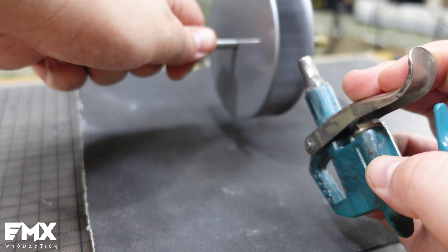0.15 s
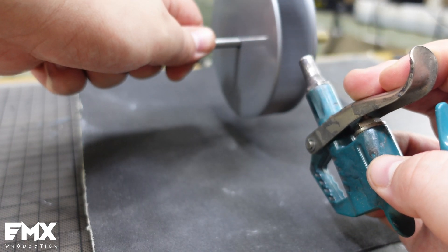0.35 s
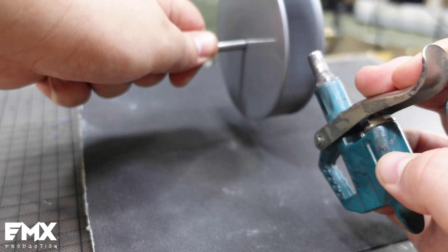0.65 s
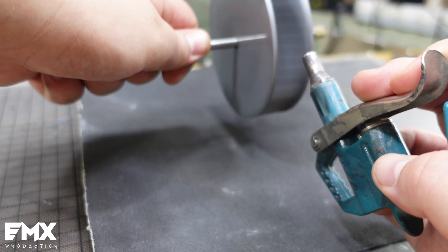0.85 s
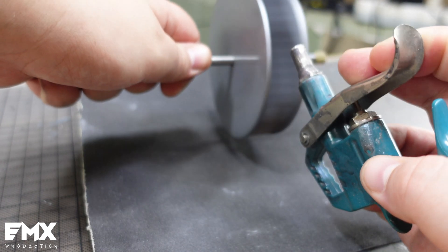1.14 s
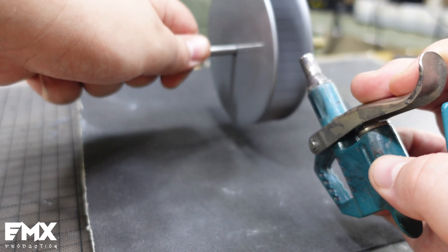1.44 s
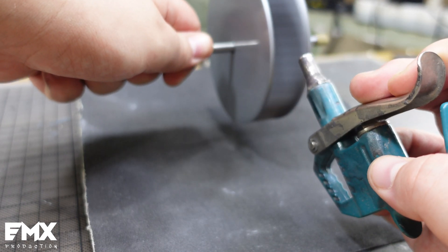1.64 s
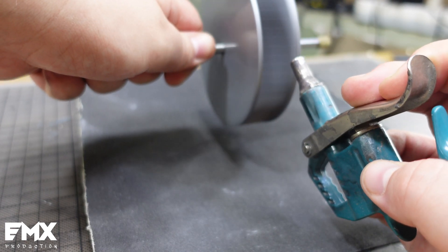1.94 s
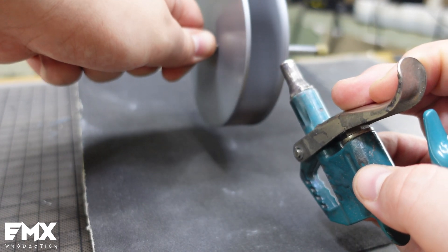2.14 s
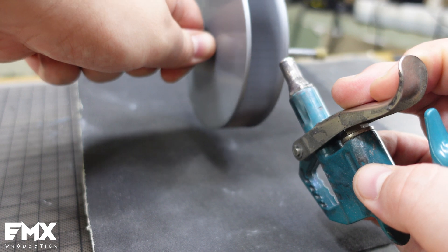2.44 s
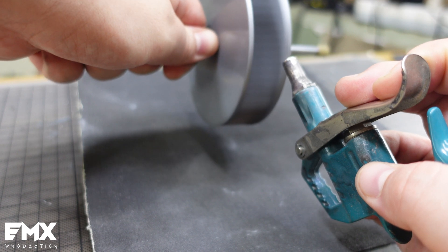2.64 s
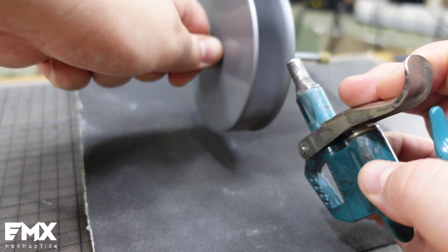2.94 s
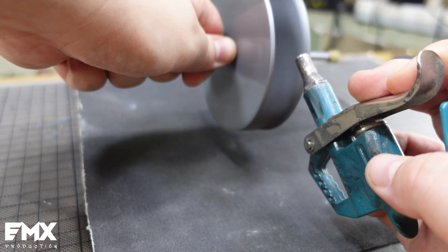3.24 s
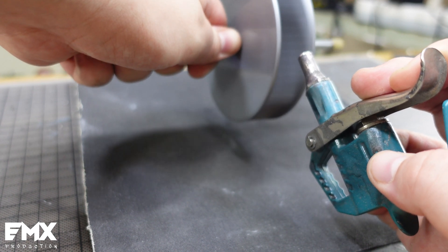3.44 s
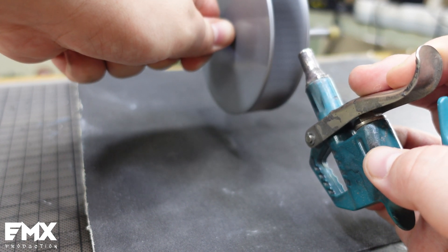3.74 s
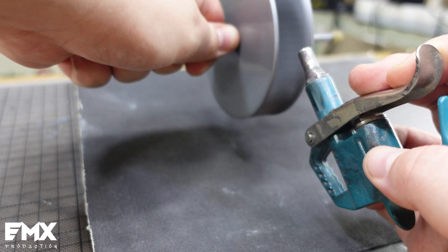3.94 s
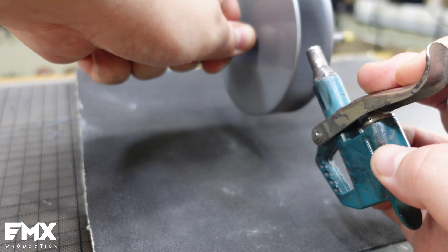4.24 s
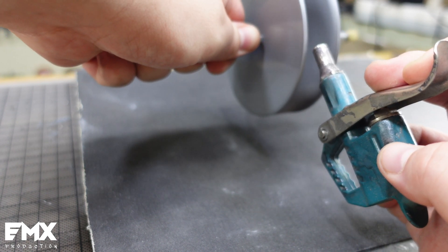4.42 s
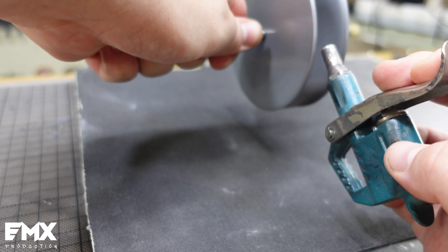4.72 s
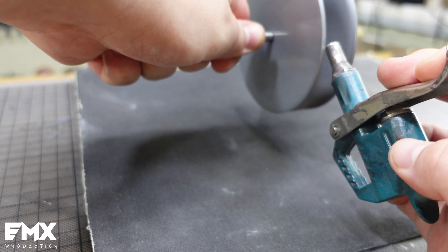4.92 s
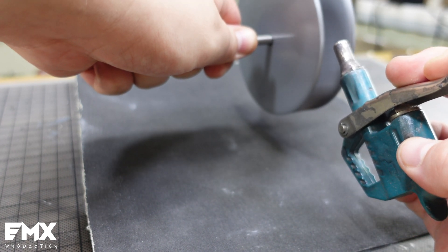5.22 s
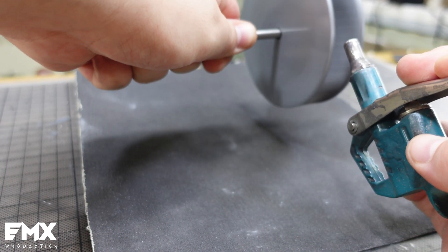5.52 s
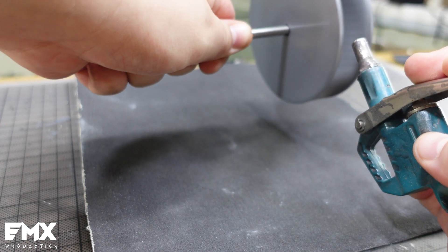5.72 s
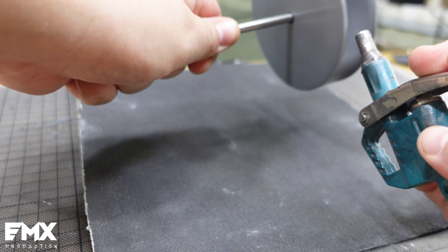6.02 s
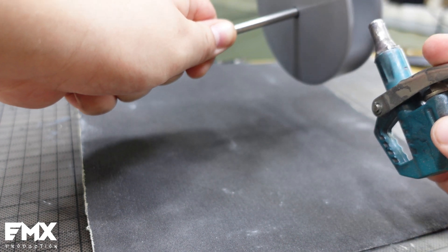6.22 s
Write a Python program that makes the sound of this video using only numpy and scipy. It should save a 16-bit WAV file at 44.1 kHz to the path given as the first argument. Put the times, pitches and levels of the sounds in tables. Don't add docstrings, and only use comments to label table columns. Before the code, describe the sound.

A close air jet spins up a little turbine: rough hiss, rising siren-like whine, one quick double click, then a piercing wavering high tone.

```python
import sys
import numpy as np
from scipy import signal
from scipy.io import wavfile
from scipy.ndimage import uniform_filter1d

SR = 44100
rng = np.random.default_rng(int(sys.argv[2]) if len(sys.argv) > 2 else 0)


def wav_out(sig):
    wavfile.write(sys.argv[1], SR, np.round(np.clip(np.atleast_2d(sig).T, -1, 1) * 32767).astype(np.int16))


def attenuation_scalar(level_db):
    decades = np.asarray(level_db, float) / 20
    return 10 ** decades


N = 280782
TIME = np.arange(N) / SR
HZ = np.fft.rfftfreq(1024, 1 / SR)[:, None]
FRAMES = np.arange(N // 256 + 5) * 256 / SR

# time in seconds, share turned away 0-1.
POSE = [
    (0, .15),
    (1.7, .1),
    (3.3, .1),
    (3.55, .3),
    (3.8, .9),
    (4.9, .9),
    (5.8, .75),
    (6., .4),
    (6.37, .3),
]


def evened(x):
    return x / np.sqrt(np.mean(x ** 2) + 1e-20)


def read(points, hz):
    f, value = np.transpose(points)
    return np.interp(np.log(hz + 1), np.log(f + 1), value)


def columns(rows, t=TIME):
    s, *values = np.transpose(rows)
    return [np.interp(t, s, v) for v in values]


def bumps(rows):
    t = TIME[::64]
    humps = sum(height * np.exp(-((t - s) / half) ** 2) for s, height, half in rows)
    return np.interp(TIME, t, humps)


def wander(rate_hz):
    low_pass = signal.butter(2, rate_hz, fs=SR, output="sos")
    return evened(signal.sosfilt(low_pass, rng.standard_normal(N)))


def shut():
    return np.interp(TIME, [.5895, .593, .603, .617], [0, 1, 1, 0])


def sag(step_db, drain_db, early_s=0):
    # start in seconds, reopening in seconds, refill time in seconds.
    slips = [
        (.482, .605, .018),
        (1.106, 1.2105, .001),
    ]
    slip_s, surge_db, surge_s = .008, 2, .01
    loss_db = 0
    for start, reopens, refill_s in slips:
        since = np.maximum(TIME - reopens, 0)
        closing = np.clip((TIME - start + early_s) / slip_s + .5, 0, 1)
        drained = np.clip((TIME - start) / (reopens - start), 0, 1) ** 2
        loss_db = loss_db + closing * (step_db + drain_db * drained) * np.exp(-since / refill_s)
        loss_db = loss_db + surge_db * (TIME > reopens) * np.exp(-since / surge_s)
    return loss_db


def drone():
    s, db, half, hz = 8, -70, 3, 206
    return bumps([(s, attenuation_scalar(db), half)]) * np.cos(2 * np.pi * hz * TIME)


def noise(gain, patchy_db, flicker_db, flicker_hz):
    # frequency in Hz, difference in dB.
    port_lean = [(60, 0.0), (700, 0.24), (1290, 0.2), (2380, -0.4), (4400, -0.8), (8120, 0.8), (15000, 1.9)]
    # frequency in Hz, dB under the ports' sum.
    facing_width = [(300, -28), (2300, -30), (2900, -11), (4100, -9), (4900, -16), (6200, -11), (8000, -16),
                    (9500, -16.5), (14200, -14.5), (14800, -24)]
    turned_width = [(300, -29), (2300, -32), (3300, -2), (4300, -20), (5200, 1), (5900, -20), (6600, -6),
                    (8000, -15.5), (13500, -13), (14400, -26)]
    side_echo_ms, side_echo_turns, side_echo_share = .76, .85, .3

    a, b, c, d, patches = rng.standard_normal((len(FRAMES), len(HZ), 5)).T
    patches = uniform_filter1d(patches, size=6, axis=0)
    patches = evened(uniform_filter1d(patches, size=50, axis=1))
    mid = a + 1j * b
    turned = columns(POSE, FRAMES)[0]

    share = side_echo_share * (1 - turned)
    echo = mid * np.exp(-2j * np.pi * (HZ * side_echo_ms / 1000 - side_echo_turns))
    width_db = (1 - turned) * read(facing_width, HZ) + turned * read(turned_width, HZ) - 3
    width_db = width_db + 4.5 * patches[::-1]
    apart = attenuation_scalar(width_db) * (np.sqrt(share) * echo + np.sqrt(1 - share) * (c + 1j * d))

    lean = attenuation_scalar(read(port_lean, HZ) / 2)
    z = np.array([(mid + apart) * lean, (mid - apart) / lean])
    z = z * gain * attenuation_scalar(patchy_db * patches) / np.sqrt((gain ** 2).mean(0))
    sound = signal.istft(z, nperseg=1024, noverlap=768)[1][:, :N]
    return evened(sound) * attenuation_scalar(flicker_db * wander(flicker_hz))


def ring(modes):
    power = 0
    for hz, width_hz, db in modes:
        off = (HZ - hz) / width_hz
        power = power + attenuation_scalar(2 * db) / (1 + (2 * off) ** 4 + (1.26 * off) ** 8)
    return np.sqrt(power)


def near_echoes():
    # time in seconds, then four echo delays in ms.
    holds = [(0, .53, .76, 1.066, 1.21), (1.7, .525, .76, 1.068, 1.212), (2.4, .555, .77, 1.08, 1.216),
             (3.4, .51, .77, 1.09, 1.215), (3.8, .555, .866, 1.122, 1.215), (4.3, .534, .866, 1.108, 1.2),
             (4.9, .534, .866, 1.06, 1.19), (5.1, .536, .868, .964, 1.186), (5.6, .542, .872, .964, 1.182),
             (6., .505, .875, .964, 1.176), (6.37, .512, .88, .958, 1.166)]
    echo_shares = [.2, .2, .14, .13]
    echoes = sum(share * np.exp(-2j * np.pi * HZ * ms / 1000)
                 for share, ms in zip(echo_shares, columns(holds, FRAMES)))
    return abs(1 + np.minimum(HZ / 8700, 1) * echoes)


def buffeting(aim):
    # frequency in Hz, level in dB per Hz.
    buffet_colour = [(30, -40), (60, -26), (115, -37), (150, -23), (200, -7), (500, 0), (1000, 1),
                     (2000, -2), (4000, -44)]
    # time in seconds, dB, half length in seconds.
    gusts = [(.12, 4.5, 0.3), (.26, 1, 0.037), (.73, 1.5, 0.045), (.8, -2, 0.029), (1., 7, 0.17),
             (1.09, -12, 0.086), (1.17, 3, 0.037), (1.24, -14, 0.058), (1.32, 1, 0.056), (1.43, -9, 0.059),
             (1.75, 1.5, 0.074), (2.08, -6, 0.081), (2.55, 2.5, 0.12), (3.06, 2.5, 0.19), (3.38, 3, 0.072),
             (3.58, -6.5, 0.047), (3.66, 2, 0.058), (3.78, -2, 0.042), (3.9, 3.5, 0.03), (4.08, -4, 0.11),
             (4.58, -7.5, 0.12), (4.85, 6, 0.04), (4.94, 13, 0.093), (5.13, -7.5, 0.061), (5.54, -8, 0.11),
             (5.8, -7.5, 0.13), (5.95, -16, 0.074), (6.12, -7, 0.19), (6.32, -1, .05)]
    sag_db = (1 - .75 * aim) * sag(-19, 0, early_s=.009)
    level_db = -12 - 15.5 * aim + bumps(gusts) + sag_db - 14 * shut()
    return attenuation_scalar(level_db) * noise(attenuation_scalar(read(buffet_colour, HZ)), 0.51, 3.53, 216)


def hiss(aim, comb, lost_db):
    # frequency in Hz, level in dB per Hz; low part, then wheel facing and turned.
    low_hiss = [(100, -77), (700, -20), (1500, -14.5), (2500, -12), (3500, -7)]
    facing_hiss = [(4300, -6.5), (4950, -5.5), (6930, -0.5), (7850, -3.5), (8500, 2.5), (10500, 0),
                   (11300, -3), (14200, -4.5), (15500, -8)]
    turned_hiss = [(4000, -6.5), (4910, -10), (5810, -8.5), (6440, -5.5), (7130, -14.5), (9150, -2),
                   (10100, -4), (11500, -3), (14200, -7), (14950, -7.5)]
    # time in seconds, centre in Hz, depth in dB.
    table_notch = [(0, 13750, 6), (1.8, 13800, 6), (2.4, 13500, 1), (4.7, 14900, 0), (5.1, 14900, 8),
                   (5.9, 14870, 2), (6.37, 14700, 4)]
    slack = (1.155, 8.3, 0.045)

    turned = columns(POSE, FRAMES)[0]
    colour_db = (1 - turned) * read(low_hiss + facing_hiss, HZ) + turned * read(low_hiss + turned_hiss, HZ)
    colour_db = colour_db - 4 * np.interp(FRAMES, TIME, aim) / (1 + (HZ / 1690) ** 8)
    slack_db = np.interp(FRAMES, TIME, bumps([slack]))
    colour_db = colour_db + slack_db / (1 + (HZ / 4300) ** 8) * (HZ > 620)
    notch_hz, notch_db = columns(table_notch, FRAMES)
    colour_db = colour_db - notch_db * np.exp(-((HZ - notch_hz) / 170) ** 2)
    return attenuation_scalar(4.5 + lost_db - 5 * shut()) * noise(attenuation_scalar(colour_db) * comb, 1.68, 0.75, 240)


def pocket_ring(aim):
    # frequency in Hz, width in Hz, level in dB.
    pocket_modes = [(2346, 570, -12.5), (2780, 336, -4.5), (3080, 1300, -12.5), (3620, 100, -31)]
    # time in seconds, dB, half length in seconds.
    ring_swells = [(.1, 0, .1), (.8, -1, 0.11), (1.45, 0, 0.068), (1.9, 1.2, .06), (2.45, -0.8, .1),
                   (2.88, -0.5, 0.061), (3.4, 1, .15), (3.8, 0.5, 0.084), (4.5, -0.5, .08), (4.85, -1, 0.054),
                   (5.5, 0, .1), (5.9, 2, .04), (6.18, -2.5, .03), (2.3, 1, .04), (3.2, 1, 0.036),
                   (1.225, 2, 0.013)]
    level_db = -6.5 - columns(POSE)[0] + 10 * aim + bumps(ring_swells)
    level_db = level_db + (0.12 + .75 * aim) * sag(-7, -7) - 14 * shut()
    return attenuation_scalar(level_db) * noise(ring(pocket_modes), 1.3, 0.98, 240)


def pocket_overtones(aim, comb, lost_db):
    # frequency in Hz, width in Hz, level in dB.
    overtone_modes = [(7450, 710, -7), (8200, 790, -4), (9700, 1000, -30)]
    level_db = -5.5 + 8 * aim + 2.1 * lost_db
    return attenuation_scalar(level_db) * noise(ring(overtone_modes) * comb, 1.6, 1.2, 200)


def jet():
    # time in seconds, hiss in dB, aim 0-1.
    nozzle = [(0, -25.5, 0.31), (.36, -26.5, 0.07), (.7, -26, 0.04), (1.05, -26, 0.84), (1.58, -25, 0.71),
              (2., -27, 0), (2.3, -25, 0.52), (2.7, -27, 0.3), (3.27, -26.5, 0.79), (3.6, -26, 0.26),
              (3.75, -28.5, 0.02), (4.5, -27, 0.41), (4.95, -31, 0.64), (5.12, -28.5, 0.14),
              (5.35, -26, 0.93), (5.92, -27.5, 0.51), (6.13, -29.5, 0.08), (6.27, -27, 0.96)]
    # time in seconds, pressure in dB, half length in seconds, shift of aim.
    wavers = [(0.133, 0.2, .07, 0.13), (1., 0.5, 0.055, -0.0016), (1.353, 0, 0.061, -0.29),
              (2.18, -1, 0.054, -0.091), (1.766, 0.9, 0.077, -0.14), (2.95, 1.5, 0.068, 0.12),
              (3.083, 0.5, 0.076, -0.24), (3.188, 2.2, 0.029, 0.033), (3.473, -0.3, 0.055, 0.026),
              (4.072, -1, 0.11, 0.12), (4.28, 0.3, 0.044, 0.12), (4.182, 0, 0.096, -0.15),
              (4.39, -2.5, 0.092, -0.11), (4.51, 0.5, 0.14, -0.084), (4.662, -1.3, 0.048, -0.25),
              (4.808, 0.1, 0.074, -0.22), (5.61, -1.1, 0.26, -0.28), (5.903, 1.5, 0.073, -0.029)]
    hiss_db, aim = columns(nozzle)
    aim = aim + bumps([(s, shift, half) for s, _, half, shift in wavers])
    hiss_db = hiss_db + bumps([row[:3] for row in wavers])

    lost_db, comb = sag(-4, -4), near_echoes()
    bright = hiss(aim, comb, lost_db) + pocket_overtones(aim, comb, lost_db)
    treble = signal.firwin(31, 7800, pass_zero=False, fs=SR)
    top = signal.oaconvolve(bright, treble[None], "same")
    dull_db = np.minimum(sag(-4.5, -2.5), 0) - 4 * shut()
    dulled = (1 - attenuation_scalar(dull_db)) * top
    return attenuation_scalar(hiss_db) * (bright + pocket_ring(aim) + buffeting(aim) - dulled)


def lever():
    # time in seconds, peak in dB, low modes in dB, scrape length in seconds.
    clicks = [
        (.5895, -11, -22, .0031),
        (.5929, -23, -8, .0014),
        (.6033, -13.5, -7, .0024),
        (.6054, -17.5, -10, .003),
    ]
    # frequency in Hz, level in dB, 60 dB decay in seconds.
    metal_modes = [(4400, -8, 0.025), (4670, 5, 0.087), (7600, 4.5, 0.058), (8170, -5, 0.028),
                   (6800, -7, 0.022), (9200, -10, 0.018), (12400, -20, .02), (14300, -16, .015)]
    out, t = np.zeros(N), np.arange(1500) / SR
    for s, db, low_db, scrape_s in clicks:
        modes = 0
        for hz, mode_db, t60 in metal_modes:
            fading = attenuation_scalar(mode_db + low_db * (hz < 6000) - 60 * t / t60)
            modes = modes + fading * np.sin(2 * np.pi * hz * t)
        hard = signal.lfilter([1, -.4], [1], rng.standard_normal(len(t) + 1))[1:]
        snap = attenuation_scalar(-9) * hard * np.exp(-(1.6 * t / scrape_s) ** 2)
        scrape = np.sin(np.pi * np.minimum(t / scrape_s, 1)) ** 0.3 + 0.06 * (t > scrape_s / 2)
        at = round(s * SR)
        out[at:at + len(t)] += attenuation_scalar(db) * (modes * scrape + snap)
    return out


def vane_rate():
    # time in seconds, vane passing rate in Hz.
    speed = [(0, 548.3), (.28, 806.5), (.45, 948), (.625, 952), (.98, 1182), (1.215, 1196), (1.245, 1123),
             (1.6, 1204), (2.07, 1470), (2.75, 1658), (3.05, 1705), (3.7, 1754), (4.1, 1762), (4.78, 1720),
             (5.47, 1725), (5.87, 1778), (6.12, 1811), (6.37, 1776)]
    # time in seconds, Hz lost, half length in seconds.
    rate_dips = [(.66, 6., 0.039), (.88, -10., 0.054), (1.13, 9., 0.039), (1.42, 8., 0.11), (1.7, -4.5, .07),
                 (1.79, 3, 0.043), (2.14, -4, .08), (2.38, -3, 0.1703), (3.85, -3, .2), (1.97, -6., 0.13),
                 (2.62, -5., .04), (2.88, -7., 0.057), (3.12, -5.5, .08), (3.41, 10., 0.16), (4.2, -4., 0.044),
                 (4.34, -5.5, .03), (4.41, 5., 0.031), (4.47, 34.5, 0.21), (4.65, 4., 0.057), (4.84, -6., .11),
                 (5.03, 42.5, .16), (5.56, 6., 0.073), (5.84, -4, 0.043), (6.11, 4, 0.053), (6.27, -4, 0.06)]
    inertia_s = .035
    hz = uniform_filter1d(columns(speed)[0], size=round(inertia_s * SR), mode="nearest")
    return hz - bumps(rate_dips)


def vane_whine(hz, turn):
    # time in seconds, peak in dB, half length in seconds.
    catches = [(0.105, -47.5, 0.22), (0.305, -36.5, 0.11), (0.427, -33, 0.066), (0.53, -38.5, 0.025),
               (0.683, -34.5, 0.083), (.82, -35.5, 0.071), (0.898, -50, 0.029), (1.121, -43, 0.012),
               (1.19, -55, .03), (1.27, -52, .03), (1.33, -50, .012), (1.503, -55, .08), (1.75, -35, 0.089),
               (1.87, -32.5, 0.068), (1.979, -29, 0.073), (2.166, -35, 0.087), (2.35, -34.5, 0.31),
               (2.735, -29.5, 0.078), (2.862, -38, 0.098), (3.002, -33.5, 0.077), (3.29, -37, 0.19),
               (3.532, -46, 0.056), (3.747, -33, 0.081), (3.87, -36.5, 0.07), (4.037, -27.5, 0.1),
               (4.252, -31, 0.055), (4.43, -28, 0.095), (4.628, -27.5, .11), (4.781, -31, 0.057),
               (4.995, -31.5, 0.13), (5.14, -28, 0.068), (5.273, -36, 0.092), (5.53, -36, 0.1),
               (5.653, -40, .04), (5.769, -31, 0.082), (5.906, -35, 0.075), (6.05, -32.5, 0.1),
               (6.267, -36.5, 0.13)]
    # time in seconds, peak in dB, half length in seconds, left-right in dB.
    octaves = [(.14, -44, 0.24, 0), (.46, -47, 0.13, -2.5), (.65, -35, 0.021, -2.5), (.76, -39, 0.044, 1),
               (.97, -33, 0.044, 0), (1.4, -37, 0.15, 0), (1.75, -40, 0.025, 1), (1.875, -35, 0.079, -11.5),
               (2.05, -33.5, 0.096, -10), (2.25, -37, .07, -4), (2.41, -31.5, 0.051, -1),
               (2.52, -27, 0.056, -4), (2.62, -29.5, 0.047, -5.5), (2.73, -28.5, 0.081, -4),
               (2.9, -37.5, 0.07, -6), (3.17, -46, .05, 7), (3.04, -39, 0.11, 12), (3.44, -33.5, 0.065, 1),
               (3.57, -40, 0.06, 8), (3.68, -29, 0.055, -6), (3.8, -26, .08, -6.5), (3.93, -19, 0.1, -3),
               (4.1, -18, 0.047, -3), (4.2, -29, 0.063, -9), (4.34, -23, 0.05, -5), (4.42, -21, 0.032, -4),
               (4.55, -45, 0.066, -8), (4.66, -26.5, 0.043, -4), (4.72, -29.5, .04, -3),
               (4.78, -38, 0.075, -14), (4.91, -37, .04, -7), (5.05, -21.5, 0.08, -3),
               (5.22, -37, .06, -10), (5.9, -42, .08, 11), (5.55, -37.5, 0.17, -17),
               (5.77, -31.5, 0.072, 15), (6.0, -34, 0.064, 9), (6.09, -22, 0.06, 3.5),
               (6.18, -22.5, 0.049, 4), (6.29, -31, 0.039, 6)]
    # time in seconds, peak in dB, half length in seconds.
    thirds = [(0.206, -43, 0.12), (0.328, -35, 0.098), (0.442, -30, 0.037), (0.557, -45, 0.031),
              (0.651, -22, 0.036), (0.76, -47, 0.05), (1.878, -36, .06), (2.03, -36, 0.11),
              (2.7, -40, 0.14), (3.06, -41, .05), (3.42, -41, .05), (3.88, -42, 0.16), (4.38, -40, 0.082),
              (4.8, -40.5, 0.099)]
    fourths = [(.28, -43, 0.1), (.43, -41, 0.045), (.65, -34, 0.03), (.7, -44, .03), (1.87, -41, 0.046),
               (2.03, -47, .04), (3.25, -45, 0.15), (3.76, -31.5, 0.07), (3.9, -36, 0.1),
               (4.07, -35, 0.045), (4.37, -42, 0.075), (4.77, -35.5, .05), (4.84, -40, 0.048),
               (5.06, -55, 0.048)]
    idle_levels = [-54, -51.5, -80, -46.5]
    # multiple, frequency the pockets favour in Hz, dB relative to multiple 4.
    upper = [(5, 8800, -2)]
    # time in seconds, multiple, depth in dB, half length in seconds.
    nulls = [(.49, 1, 9, .012), (.595, 1, 10, .012), (1.23, 1, 20, .015), (3.655, 1, 10, .015),
             (4.17, 1, 6, .02), (2.556, 2, 12, .005), (2.575, 1, 10, .012), (2.614, 2, 10, .007),
             (2.642, 2, 9, .003), (2.667, 2, 12, .005), (2.8, 2, 10, .015), (4.172, 2, 18, .01),
             (4.375, 2, 6, .007), (4.398, 2, 14, .006), (4.775, 2, 10, .008), (4.86, 2, 10, .012),
              (4.424, 2, 8, .004), (5.711, 1, 18, .013), (5.83, 2, 10, .012)]

    levels_db = []
    for idle_db, rows in zip(idle_levels, (catches, octaves, thirds, fourths)):
        swells = bumps([(s, attenuation_scalar(db), half) for s, db, half, *_ in rows])
        levels_db.append(20 * np.log10(attenuation_scalar(idle_db) + swells))
    partials = list(enumerate(levels_db, 1))
    for k, best_hz, db in upper:
        partials.append((k, levels_db[3] + db - 48 * abs(np.log2(k * hz / best_hz))))

    lean_db = {1: -1.2 * np.clip((TIME - 3.9) / 0.27, .15, 1),
               2: .55 * columns(octaves)[2],
               3: 3.5 * columns(POSE)[0] - 1.5}
    out = np.zeros((2, N))
    for k, level_db in partials:
        null_db = bumps([(s, db, half) for s, which, db, half in nulls if which == k]) if k < 3 else 0
        level_db = level_db - 0.46 - null_db + .6 * wander(22)
        tone = np.sqrt(2) * attenuation_scalar(level_db) * np.cos(k * turn + 2 * np.pi * rng.random())
        out += tone * attenuation_scalar(np.outer([1, -1], lean_db.get(k, np.zeros(N))))
    return out


def bent_vane(turn, vanes):
    # time in seconds, peak in dB, half length in seconds, shaft turns away.
    side_lines = [(3.78, -38, 0.12, 2), (4., -37, .1, 2), (3.78, -43, .1, -2), (4.05, -41., .12, -2),
                  (4.55, -47, 0.11, -2), (4.36, -39, 0.097, -1), (4.7, -42., 0.16, -1),
                  (4.78, -41, .06, -2), (5.17, -40., 0.097, -1), (5.45, -47, .1, -1), (5.761, -41, .06, -2),
                  (5.972, -34, 0.038, -2), (6.23, -33, 0.055, -2)]
    out = np.zeros(N)
    for away in (-2, -1, 2):
        size = bumps([(s, attenuation_scalar(db), half) for s, db, half, turns in side_lines if round(turns) == away])
        out += np.sqrt(2) * size * np.cos((2 + away / vanes) * turn)
    return out


def wheel():
    vanes = 15
    hz = vane_rate()
    turn = 2 * np.pi * np.cumsum(hz * (1 + 0.00047 * wander(23))) / SR
    hum = attenuation_scalar(-73) * columns(POSE)[0] * np.cos(turn / vanes)
    return attenuation_scalar(-14 * shut()) * (vane_whine(hz, turn) + bent_vane(turn, vanes)) + hum


def scene():
    edge = signal.firwin(1023, 15760, window=("kaiser", 6), fs=SR)
    return signal.oaconvolve(drone() + jet() + wheel(), edge[None], "same") + lever()


def top_cut(x):
    return signal.sosfilt(signal.butter(12, 16510, fs=SR, output="sos"), x)


def record(dry):
    dry = signal.sosfilt(signal.butter(3, 130, "high", fs=SR, output="sos"), dry)
    power_db = 10 * np.log10(abs(uniform_filter1d((dry ** 2).mean(0), size=60)) + 1e-12)
    fall = TIME * 1700
    held_db = np.maximum.accumulate(power_db + fall) - fall
    over_db = np.maximum(held_db + 19.5, 0)
    mix = dry / attenuation_scalar(0.34 * uniform_filter1d(over_db, size=90))
    return top_cut(mix)


dry = scene()
out = record(dry)
wav_out(out)
```